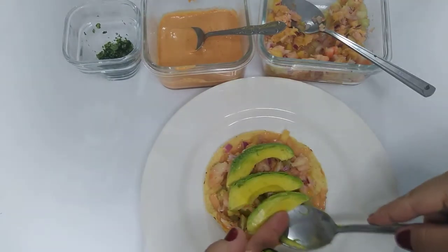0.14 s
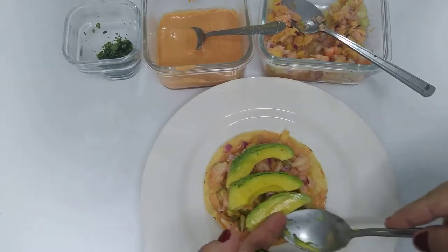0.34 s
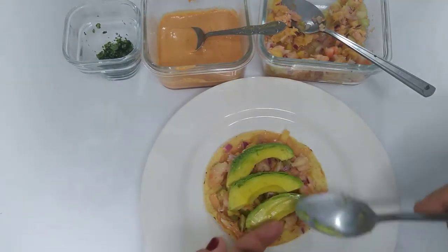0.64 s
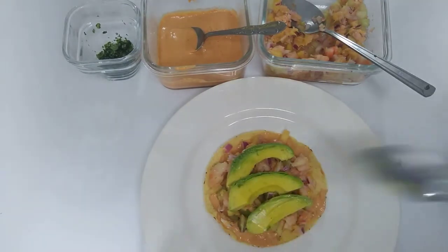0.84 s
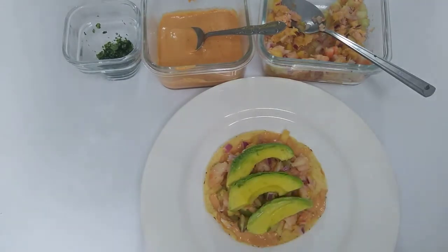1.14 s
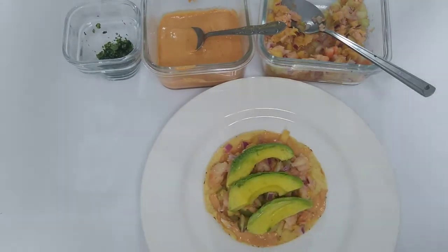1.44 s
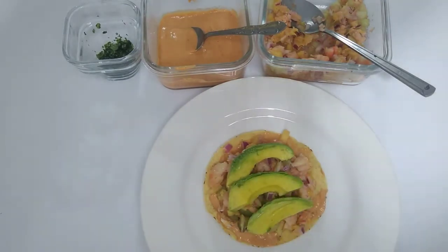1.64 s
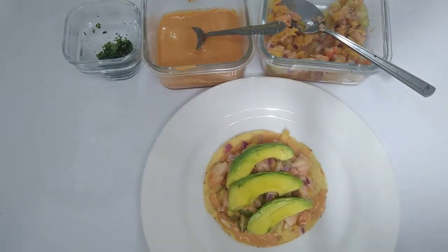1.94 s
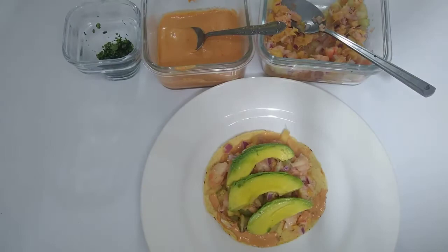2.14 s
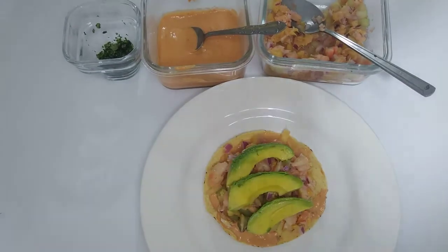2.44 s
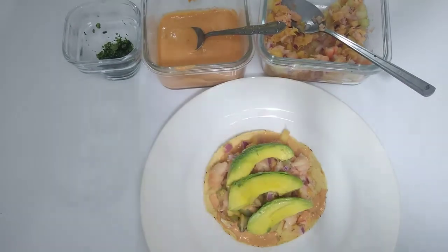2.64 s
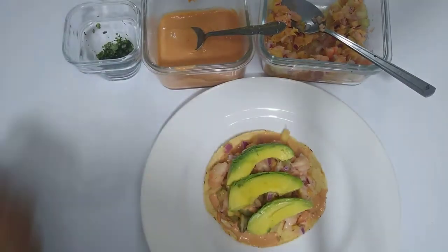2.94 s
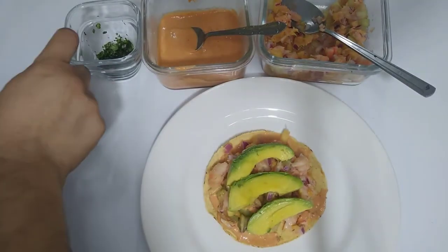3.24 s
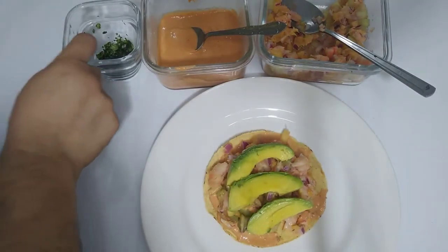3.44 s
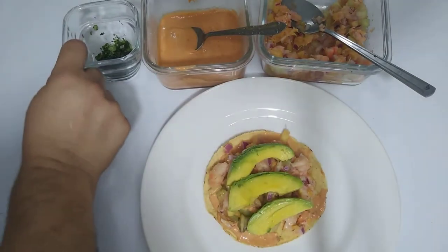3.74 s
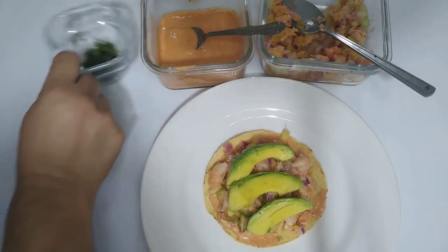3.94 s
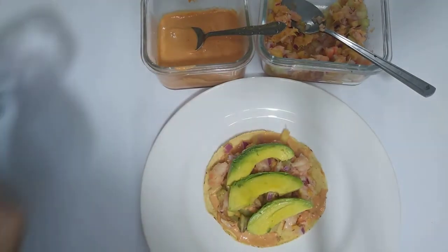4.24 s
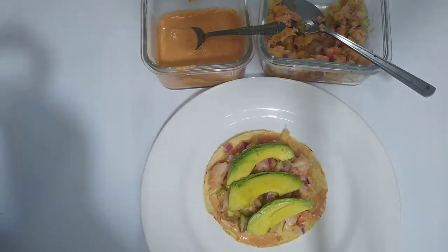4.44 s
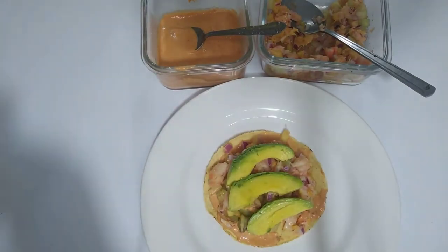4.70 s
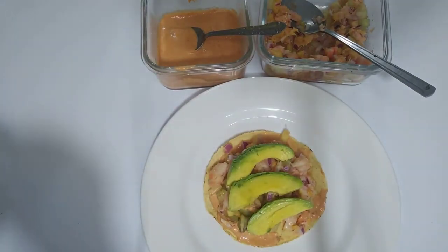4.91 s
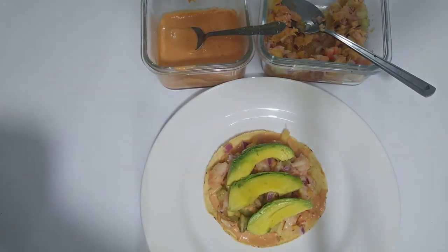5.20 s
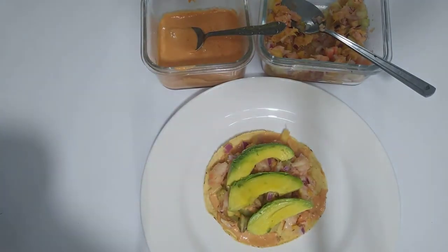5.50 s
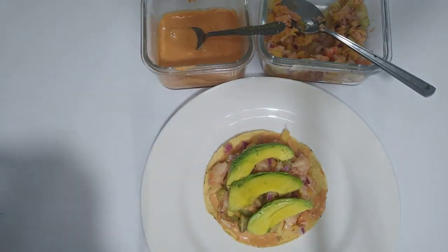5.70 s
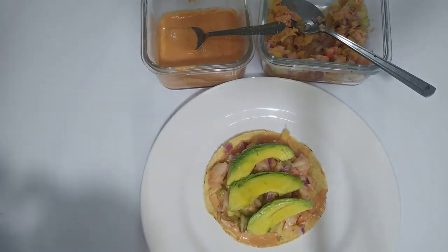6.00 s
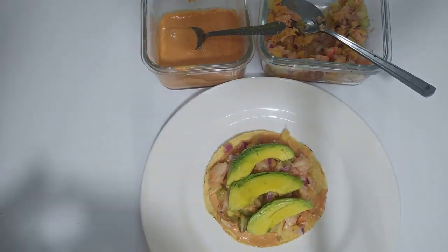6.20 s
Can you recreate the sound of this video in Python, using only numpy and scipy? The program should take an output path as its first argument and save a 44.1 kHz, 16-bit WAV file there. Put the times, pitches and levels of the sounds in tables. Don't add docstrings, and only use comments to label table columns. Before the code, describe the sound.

Phone stereo just above a kitchen table: low fridge hum and faint hiss throughout, with light cloth and skin brushing. Midway come two heavy dish knocks, joined by a gritty drag, the second being the loudest. Next, a small glass dish rattles on its base and is picked up. Later there is a soft glass touchdown, a clear high clink of steel on glass, and two dry little ticks amid rustling.

```python
import sys
import numpy as np
from scipy import signal
from scipy.fft import rfft, irfft, next_fast_len
from scipy.io import wavfile
from scipy.ndimage import map_coordinates

SR = 44100
rng = np.random.default_rng(int(sys.argv[2]) if len(sys.argv) > 2 else 0)


def elevation(decibels):
    levels = np.asarray(decibels, float)
    return 10 ** (levels / 20)


def output_pcm(signal):
    pcm = np.clip(np.atleast_2d(signal).T, -1, 1) * 32767
    wavfile.write(sys.argv[1], SR, np.round(pcm).astype(np.int16))


N = 280476


def along(points, hz):
    f, v = np.transpose(points)
    return np.interp(np.log(hz + 1), np.log(f + 1), v)


def curves(rows):
    s, *cols = np.transpose(rows)
    return [np.interp(np.arange(N) / SR, s, c) for c in cols]


def unit(x):
    return x / np.sqrt(np.mean(x ** 2) + 1e-20)


def wobble(rate):
    knots = rng.standard_normal(int(N * rate / SR) + 4)
    return map_coordinates(knots, [np.arange(N) * rate / SR])


def filtered(x, response):
    m = next_fast_len(x.shape[-1] + 8192)
    spectrum = rfft(x, m) * response(np.fft.rfftfreq(m, 1 / SR))
    return irfft(spectrum, m)[..., :x.shape[-1]]


def resonances(modes, f, sign=-1):
    total = 0
    for k, (hz, width, db) in enumerate(modes):
        total = total + sign ** k * elevation(db) * 1j * f * width / (hz * hz - f * f + 1j * f * width)
    return total


def swell(s, rise_s, fall_s):
    t = np.arange(N) / SR - s
    return elevation(-20 * np.where(t < 0, -t / abs(rise_s), t / abs(fall_s)))


# frequency in Hz, port difference against port sum in dB.
PORT_DIFFERENCE = [(30, 7.5), (120, -18), (250, -13), (400, -6), (600, -2.5), (1000, 0), (14000, -0.5)]


def scattered(pair):
    mid, side = filtered(pair, lambda hz: np.array([1 + 0 * hz, elevation(along(PORT_DIFFERENCE, hz))]))
    return np.array([mid + side, mid - side])


def noise(response, grain_db=0):
    grains = elevation(grain_db * wobble(400)) * rng.standard_normal((2, N))
    return unit(scattered(filtered(grains, response)))


# frequency in Hz, time to fall 60 dB in seconds.
ROOM_DECAY = [(100, 0.45), (500, 0.4), (2000, 0.63), (6000, 0.61), (14000, 0.068)]


def add(out, s, sound, lag_ms, room_db):
    hz, t, z = signal.stft(rng.standard_normal((2, SR * 2 // 5)), SR, nperseg=256)
    decay = elevation(-60 * t / along(ROOM_DECAY, hz)[:, None])
    tail = scattered(signal.istft(z * decay, SR, nperseg=256)[1])
    tail /= np.linalg.norm(tail[0])
    wet = signal.fftconvolve(np.pad(sound, (130, 0))[None], tail, axes=1)
    sides = np.array([[1], [-1]])
    direct = filtered(np.pad(sound, (32, 0)), lambda f: np.exp(-1j * np.pi * f * sides * lag_ms / 1000))
    for wave in (direct, elevation(room_db) * wet):
        part = out[:, round(s * SR) - 32:][:, :wave.shape[1]]
        part += wave[:, :part.shape[1]]


def hard(f, hz):
    return 1 / (1 + 1j * f / hz) ** 2


def knocks(events, body, blow, place):
    out, t = np.zeros((2, N)), np.arange(SR // 8) / SR
    crack_db, lag_ms, room_db = place
    impulse = 1. * (t == 0)
    for s, db, hz in events:
        strengths = rng.standard_normal(len(body))
        struck = [(c, w, level + 0.5 * g) for (c, w, level), g in zip(body, strengths)]
        ring = filtered(impulse, lambda f: resonances(struck, f, sign=0.92) * 1j * f / (55 + 1j * f) * blow(f, hz))
        hardness_db = 7 * np.log2(hz / 1000)
        crack = elevation(crack_db + hardness_db - 60 * t / 0.012) * rng.standard_normal(len(t))
        add(out, s, elevation(db + 3.0) * (ring / np.abs(ring).max() + crack), lag_ms, room_db)
    return out


# time in seconds, level in dB.
BACKGROUND = [(0.0, -61.5), (2.4, -61.5), (3.0, -56.5), (4.2, -55.5), (4.8, -57.5), (5.6, -57), (6.36, -59)]
# frequency in Hz, density in dB per Hz.
KITCHEN_AIR = [(25, -25), (60, -9), (120, -7.5), (200, 1), (280, -7.5), (420, -13), (650, -23.5),
               (1000, -27.5), (1600, -31), (2500, -33), (4000, -38.5), (7000, -47), (11000, -49.5),
               (14000, -71)]
# frequency in Hz, level at first in dB, level at last in dB, unsteadiness in Hz.
FRIDGE_TONES = [(121.8, -8, -6, 4.5), (172.8, -8.5, -7, 7.3), (248, -8.5, -8.5, 6), (364, -19.5, -19.5, 6),
                (592.6, -26, -20, 1.236), (764, -22.5, -24, 0.95), (2690, -28.5, -30, 1.08),
                (3670, -43, -35, 6.4)]


def kitchen():
    t = np.arange(N) / SR
    tones = 0
    for hz, first_db, last_db, drift_hz in FRIDGE_TONES:
        level_db = first_db + (last_db - first_db) * t / t[-1] + 0.6 * drift_hz * wobble(drift_hz)
        drift = np.cumsum(drift_hz * 0.4063 * wobble(drift_hz)) / SR
        phase = 2 * np.pi * (hz * t + drift) + np.array([[0], [hz / 1500]])
        tones = tones + elevation(level_db) * np.sin(phase)
    air = noise(lambda f: elevation(along(KITCHEN_AIR, f))) * elevation(.5 * wobble(3))
    left_db = 1.5 * np.array([[.5], [-.5]])
    return elevation(curves(BACKGROUND)[0] + 3.0 + left_db) * (air + elevation(6) * tones)


# peak in seconds, level in dB, fade in seconds, brightness in dB.
BRUSHES = [(1.5, -83.5, 0.46, 6), (1.72, -80, 0.26, -4), (2.0, -79, 0.33, 3.5), (2.12, -77.5, 0.072, 7.5),
           (2.265, -78, 0.071, 2), (2.5, -70, 0.17, 1.2), (4.45, -72.5, 1, .6), (4.875, -76, 0.14, 5),
           (5.25, -74, .3, 1), (5.6, -81, 1, 3), (5.89, -71.5, 0.046, 0), (6.084, -65, 0.061, 2.5),
           (6.13, -65.5, 0.23, -0.5), (6.36, -79, 0.11, -3)]


def rustle():
    dull = noise(lambda f: f / (f + 900) / (1 + (f / 4000) ** 2), grain_db=1.5)
    bright = noise(lambda f: (f / (f + 5000)) ** 2 * (f < 14500), grain_db=-2.0)
    out = np.zeros((2, N))
    for s, db, fade_s, tilt_db in BRUSHES:
        stroke = elevation(db) * swell(s, 0.46 * fade_s, fade_s)
        out += stroke * (elevation(-tilt_db + 3.5) * dull + elevation(tilt_db) * bright)
    return out


# peak in seconds, frequency in Hz, level in dB, rise and fall in seconds.
SLIPS = [
    (3.72, 1920, -55, 0.094),
]


def squeak():
    out = np.zeros((2, N))
    for s, hz, db, length_s in SLIPS:
        phase = 2 * np.pi * np.cumsum(hz + 90 * wobble(150)) / SR
        ports = np.array([np.sin(phase), np.sin(phase + 0.79)])
        out += elevation(db + 3.1 * wobble(70)) * swell(s, length_s, length_s) * ports
    return out


# start in seconds, level in dB, ring in dB, lag of the left port in ms.
SPOON_TOUCHES = [
    (5.184, -33, -7, -0.145),
    (5.2349, -52.5, 0.5, -0.15),
    (5.889, -50, -40, -0.17),
    (6.084, -44, -42, 0.14),
]
# frequency in Hz, level in dB, time to fall 60 dB in seconds, beat in Hz.
GLASS_TONES = [(2891, -7, 0.4, 6), (6019, -16, 0.33, 2), (8479, -14, 0.65, 39), (10730, -24, .15, 30),
               (11520, 2, 0.11, 55)]


def spoon():
    out, t = np.zeros((2, N)), np.arange(SR * 3 // 5) / SR
    for s, db, ring_db, lag_ms in SPOON_TOUCHES:
        ring = np.zeros(len(t))
        for hz, level, t60, beat_hz in GLASS_TONES:
            beat = 1 + 0.28 * np.cos(2 * np.pi * beat_hz * t)
            ring += elevation(level - 60 * t / t60) * np.sin(2 * np.pi * hz * (t + round(s * SR) / SR)) * beat
        click = elevation(-60 * t / 0.0051) * np.diff(rng.standard_normal(len(t) + 1))
        add(out, s, elevation(db + 1) * (elevation(ring_db - 6.5) * ring + .5 * click), lag_ms, room_db=-14)
    return out * elevation([[-2], [2]])


# start in seconds, peak in dB, contact hardness in Hz.
GLASS_CONTACTS = [
    (4.865, -44, 4000),
    (4.869, -42.5, 2000),
    (4.879, -44, 5000),
    (4.897, -52, 4000),
]
# frequency in Hz, width in Hz, level in dB.
GLASS_MODES = [(350, 61, 7), (480, 38, -11), (1000, 140, -40), (2400, 130, -4), (2780, 300, -5),
               (4000, 140, -3), (4300, 180, -7), (5140, 170, -11), (8850, 660, -9)]


def glass_set_down():
    return knocks(GLASS_CONTACTS, GLASS_MODES, hard, (-54, 0.43, 0.91))


# start in seconds, peak in dB, pitch in Hz.
ROCKING_CONTACTS = [(1.651, -56, 1330), (2.533, -58, 950), (3.533, -50.5, 686), (3.538, -42, 480),
                    (3.583, -36, 420), (3.587, -43, 760), (3.651, -35.5, 480), (3.654, -30.5, 473),
                    (3.685, -33.5, 580), (3.709, -39, 494), (3.728, -36.5, 620), (3.731, -34, 444),
                    (3.741, -35.5, 407), (3.894, -47, 620), (3.908, -38, 520), (3.919, -39, 350),
                    (3.934, -48, 370)]
# frequency in Hz, width in Hz, level in dB.
SMALL_DISH_MODES = [(170, 19, 8.5), (307, 27, -4), (334, 66, -1), (480, 19, 0.5), (635, 150, -7.5),
                    (868, 18, -1.5), (1135, 110, 1), (1330, 230, 0.5), (1930, 190, 6.5), (2500, 1300, 3.5),
                    (4770, 250, -20)]


def rocking_dish():
    def rocking(f, hz):
        near_pitch = resonances([(hz, .8 * hz, 0)], f) ** 2
        return (near_pitch + elevation(-16)) * hard(f, 2.5 * hz)
    return knocks(ROCKING_CONTACTS, SMALL_DISH_MODES, rocking, (-40, .16, -3))


# peak in seconds, hiss in dB, rise in seconds, fall in seconds, rumble over hiss in dB.
DRAGS = [
    (2.70, -66.5, 0.6, 0.014, 2.5),
    (2.713, -46.5, .004, 0.085, -11),
    (2.918, -43, 0.16, 0.18, -10),
    (3.066, -46.5, 0.0088, 0.13, 11),
    (3.681, -61.5, 0.063, 0.13, 15.5),
    (3.934, -66, 0.059, 0.065, 4),
    (4.875, -69.5, .02, 0.24, 10.5),
]
# frequency in Hz, width in Hz, level in dB.
DRAG_MODES = [(130, 45, 6.5), (435, 71, 9.5), (1013, 99, -0.5), (1940, 560, -6), (3620, 1600, -15.5),
              (6080, 350, -15), (7300, 39, -28), (9760, 600, -17), (12000, 160, -58)]


def slide():
    hiss = noise(lambda f: (resonances(DRAG_MODES, f) + elevation(-23.5)) * f / (f + 1500), grain_db=0.5)
    rumble = noise(lambda f: resonances(DRAG_MODES, f) / (1 + (f / 1500) ** 2), grain_db=-5.5)
    out = np.zeros((2, N))
    for s, db, rise_s, fall_s, drum_db in DRAGS:
        out += elevation(db) * swell(s, rise_s, fall_s) * (elevation(5.5) * hiss + elevation(drum_db) * rumble)
    return out


# start in seconds, peak in dB.
TABLE_BLOWS = [
    (2.717, -23.5),
    (3.125, -25.5),
    (3.164, -36),
    (4.866, -43),
]
# frequency in Hz, width in Hz, level in dB.
TABLE_MODES = [(66, 73, -6), (127, 8.2, 1), (187, 64, 5), (250, 140, -11)]


def table_thuds():
    thuds = [(s, db, 500) for s, db in TABLE_BLOWS]
    return knocks(thuds, TABLE_MODES, hard, (-70, 0.22, .6))


# start in seconds, peak in dB, contact hardness in Hz.
FIRST_CONTACTS = [
    (2.7126, -19, 3020),
    (2.7145, -14, 1290),
    (2.738, -26.5, 685),
    (2.757, -30, 1200),
    (2.793, -37, 700),
    (2.814, -42, 1500),
]
# frequency in Hz, width in Hz, level in dB.
FIRST_MODES = [(177, 26, 2.5), (379, 130, -0.5), (470, 44, -0.5), (625, 12, -2.5), (871, 53, -1.5),
               (964, 49, -4), (1076, 59, -6), (1205, 36, -7), (1390, 140, -22), (2040, 800, -8.5),
               (2770, 410, -2), (3800, 110, -6)]
# start in seconds, peak in dB, contact hardness in Hz.
RIM_CONTACTS = [
    (2.7135, -18, 6000),
    (2.7462, -21.5, 6000),
]
# frequency in Hz, width in Hz, level in dB.
RIM_MODES = [(1430, 200, -10), (2050, 620, -2), (2520, 220, -20), (3690, 130, 1.5), (5360, 390, -20)]


def first_dish():
    base = knocks(FIRST_CONTACTS, FIRST_MODES, hard, (-31, 0.213, 0.89))
    return base + knocks(RIM_CONTACTS, RIM_MODES, hard, (-41, .085, -3.5))


# start in seconds, peak in dB, contact hardness in Hz.
SECOND_CONTACTS = [
    (3.0655, -8.5, 2780),
    (3.0678, -20.5, 1530),
    (3.0742, -22.5, 4970),
    (3.1232, -25, 595),
    (3.1655, -25.5, 700),
]
# frequency in Hz, width in Hz, level in dB.
SECOND_MODES = [(168, 18, -8.5), (350, 41, -4), (440, 170, -1.5), (626, 88, -4), (860, 140, -8),
                (967, 75, -4), (1110, 140, -17), (1320, 150, -10), (1660, 480, -6.5), (2330, 550, -13),
                (2820, 104, -2), (3450, 230, -25), (5500, 440, -25)]


def second_dish():
    return knocks(SECOND_CONTACTS, SECOND_MODES, hard, (-39.5, 0.15, -2))


def scene():
    background = kitchen() + rustle() + squeak()
    glass = spoon() + glass_set_down() + rocking_dish()
    return background + glass + slide() + table_thuds() + first_dish() + second_dish()


def band_limit(x):
    return signal.sosfilt(signal.butter(12, 15140, fs=SR, output="sos"), x)


# frequency in Hz, density in dB per Hz.
PHONE_HISS = [(1000, -11), (4000, 2.5), (8000, 3), (14000, -0.5)]


def record(dry):
    def crossing(f):
        late = np.exp(-2j * np.pi * f * 21.2 / SR)
        return 0.79 * f / (f + 4) / (1 + (f / 7500) ** 2) * late

    def port_tone(f):
        right_db = 1.2 * np.array([[-.5], [.5]])
        return elevation(right_db * f / (f + 9000)) / (1 + (f / 13500) ** 12)

    cross = filtered(dry[::-1], crossing)
    hiss = elevation(curves(BACKGROUND)[0] - 18) * noise(lambda f: elevation(along(PHONE_HISS, f)))
    wide = filtered(dry - cross, port_tone)
    mix = filtered(wide + hiss, lambda f: np.where(f < 14280, 1, elevation(-20)))
    return band_limit(mix)


dry = scene()
out = record(dry)
output_pcm(out)
```